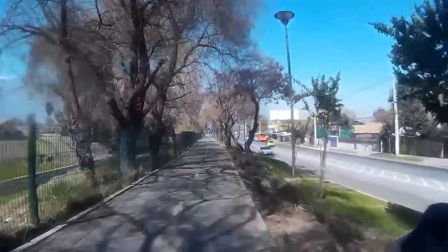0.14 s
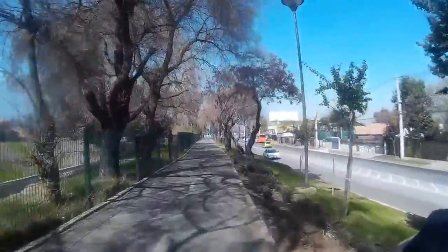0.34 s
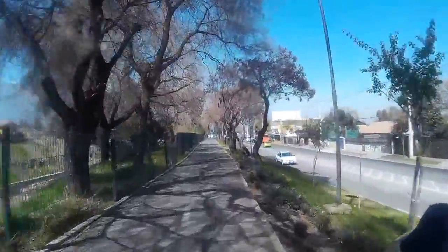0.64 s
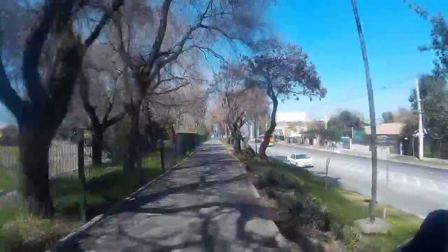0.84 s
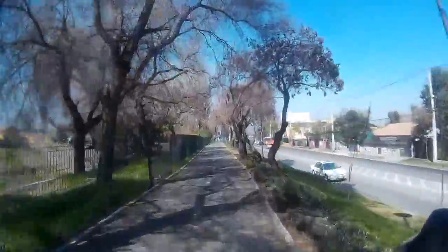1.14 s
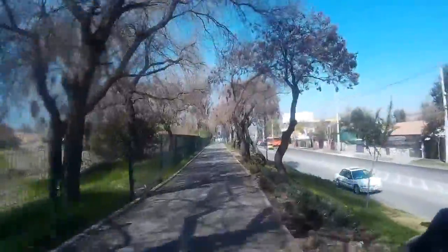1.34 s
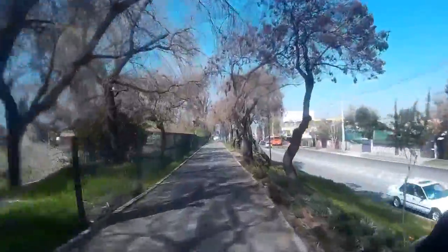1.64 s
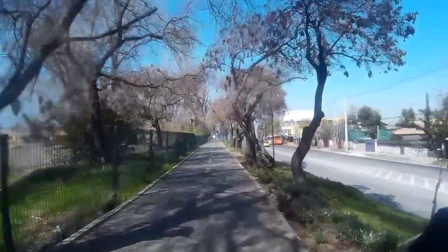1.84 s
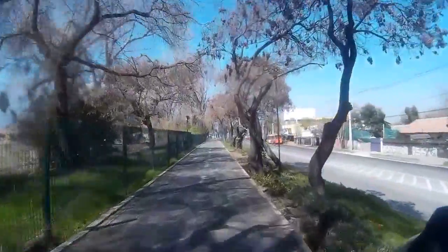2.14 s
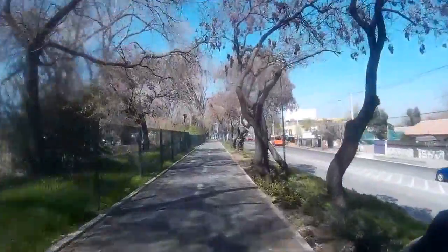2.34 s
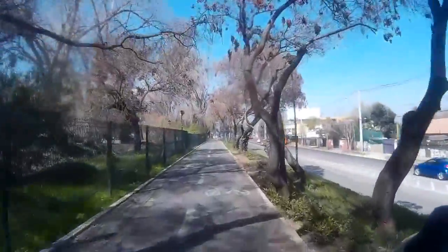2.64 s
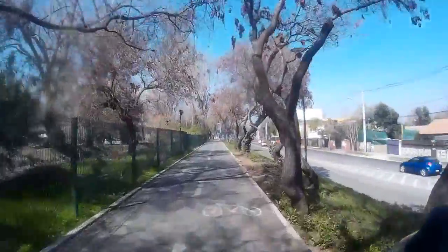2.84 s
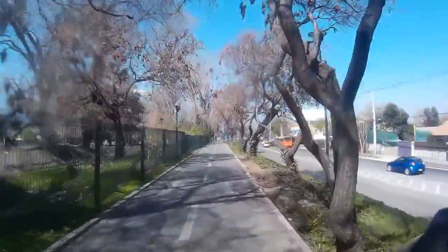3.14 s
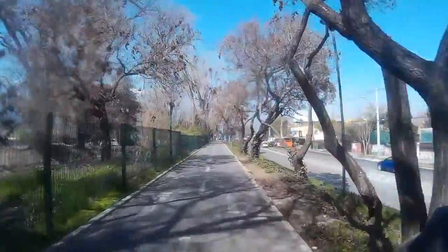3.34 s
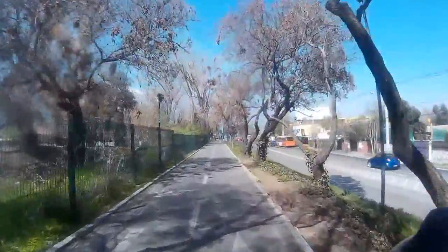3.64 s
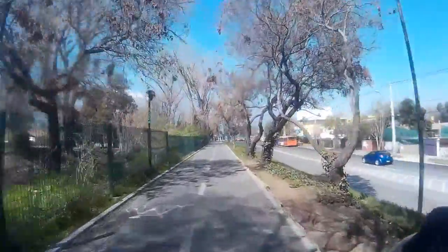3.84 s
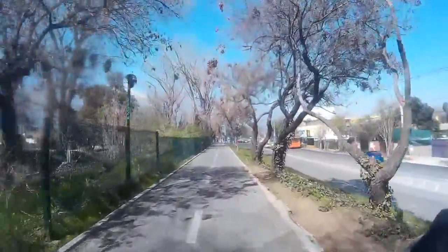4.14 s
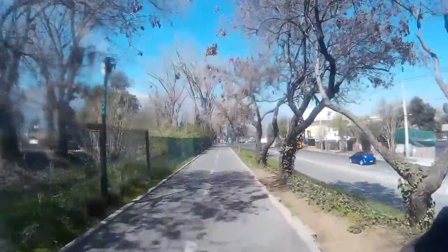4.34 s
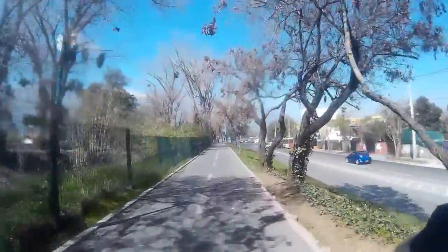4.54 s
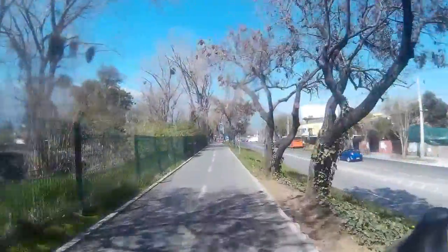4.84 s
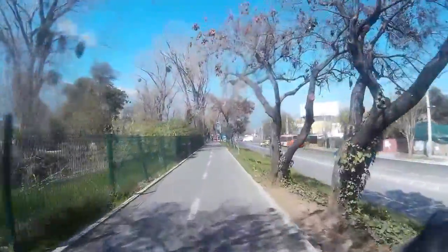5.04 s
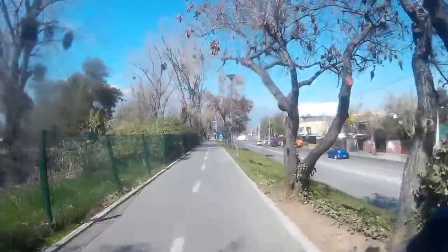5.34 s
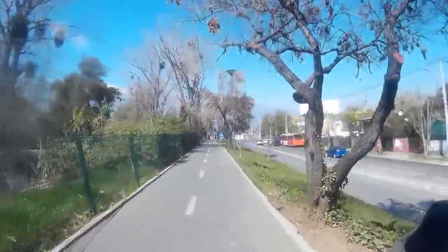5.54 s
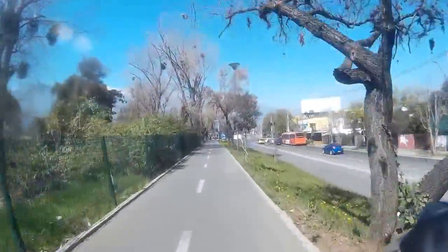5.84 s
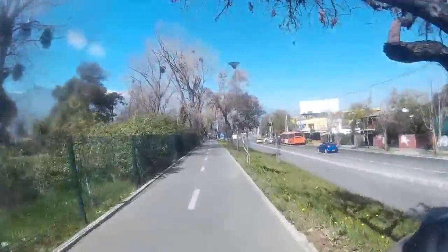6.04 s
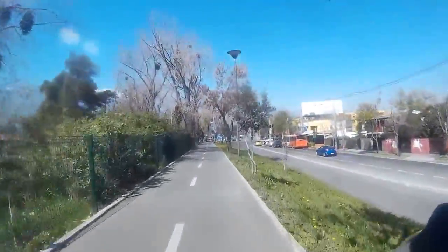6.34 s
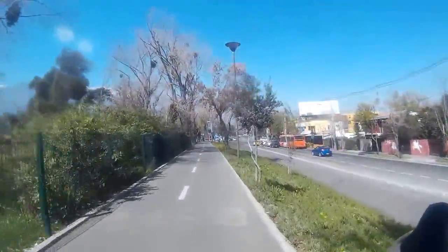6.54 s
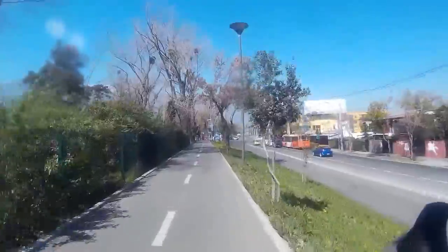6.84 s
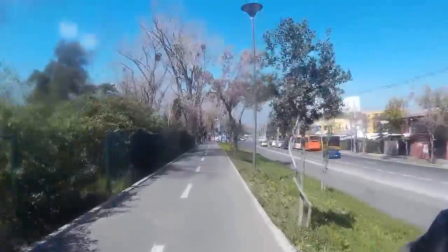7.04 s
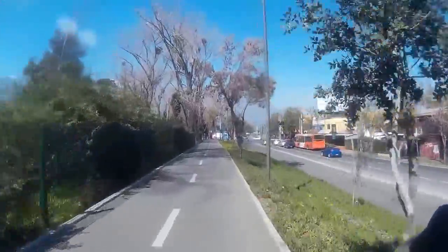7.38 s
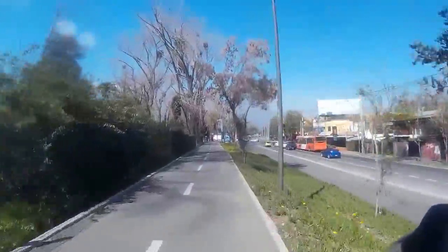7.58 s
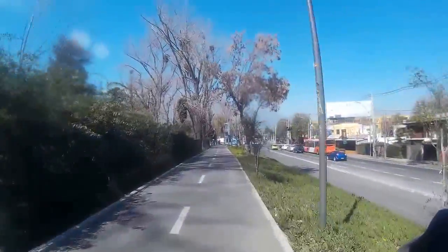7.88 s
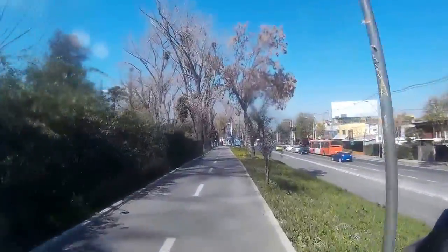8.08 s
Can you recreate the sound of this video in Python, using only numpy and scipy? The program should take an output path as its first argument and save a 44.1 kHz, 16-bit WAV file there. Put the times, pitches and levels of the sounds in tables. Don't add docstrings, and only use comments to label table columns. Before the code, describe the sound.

Continuous boxy rumble of a bike on a paved path, a very low hum surging over bumps, scattered thumps, small ticks and faint hiss.

```python
import sys
import numpy as np
from scipy import signal
from scipy.fft import rfft, irfft, next_fast_len
from scipy.io import wavfile
from scipy.ndimage import uniform_filter1d, map_coordinates

SR = 44100
rng = np.random.default_rng(int(sys.argv[2]) if len(sys.argv) > 2 else 0)


def bounce(signal):
    frames = np.transpose(np.atleast_2d(signal))
    limited = np.clip(frames, -1, 1)
    pcm = np.round(limited * 32767).astype(np.int16)
    wavfile.write(sys.argv[1], SR, pcm)


def level_to_linear(level):
    exponent = np.asarray(level, float) / 20
    return 10 ** exponent


N = 362061

# time in seconds, level in dB.
ROAD = [(0, -36.5), (.5, -37.5), (.6, -36.5), (.68, -40), (.76, -33.5), (1.05, -33), (1.2, -34),
        (1.38, -33), (2, -34), (3.1, -34.5), (3.42, -31), (3.7, -34), (5.1, -36), (5.55, -34), (6.1, -38),
        (6.3, -35), (6.65, -36), (8.21, -35)]
# peak in seconds, level in dB, dying time in seconds.
RIPPLES = [(.12, -47, .06), (.57, -42.5, 0.054), (.74, -44, .05), (1.02, -40, .06), (1.2, -37, .04),
           (1.55, -37, .15), (1.93, -38.5, .04), (2.42, -40, 0.16), (2.93, -37, .05), (3.11, -39, .05),
           (3.42, -30, 0.053), (3.57, -33, .09), (4.02, -40, .1), (4.75, -42, .08), (5.28, -43, .05),
           (5.42, -37, .04), (5.68, -39, .05), (6.03, -37.5, .05), (6.21, -39, 0.046), (6.39, -43, .03),
           (6.53, -38, 0.034), (6.78, -42, 0.16), (7.15, -44, 0.12), (7.7, -41, 0.082), (8.05, -41, 0.043)]
# peak in seconds, level in dB, dying time in seconds.
PATCHES = [(.2, -42, 0.096), (.64, -45, 0.078), (.9, -44.5, 0.14), (1.26, -43, 0.086), (1.53, -43, .07),
           (2.1, -44.5, 0.087), (2.4, -45, 0.24), (3.02, -44.5, 0.064), (3.2, -46.5, 0.11),
           (3.46, -44, 0.13), (3.62, -42.5, 0.13), (4.02, -39.5, 0.075), (4.3, -43, 0.15),
           (5.05, -43.5, 0.027), (5.27, -43.5, 0.15), (5.5, -51, .1), (5.82, -42, 0.092),
           (6.05, -46.5, 0.081), (6.3, -49, 0.12), (6.5, -45, 0.18), (6.75, -44, 0.15), (6.97, -42, .06),
           (7.25, -44.5, 0.16), (7.86, -47, 0.18), (8.05, -50, 0.042)]
# time in seconds, pitch in Hz, level in dB.
SWAY = [(0, 32.5, -34.5), (.55, 31.85, -35), (1.46, 34.62, -30.5), (2.4, 31.9, -32.5), (2.9, 32.8, -36),
        (3.41, 34.92, -40), (3.61, 35, -29), (3.75, 29.8, -34.5), (4.3, 31.7, -43), (4.89, 33.3, -35.5),
        (5.4, 32.3, -36), (5.49, 29.6, -33), (6.1, 33.3, -38), (6.72, 33.2, -28), (7.72, 32.6, -35),
        (7.85, 37.6, -42), (8.21, 36.8, -39)]
# widest swing in seconds, level in dB, dying time in seconds.
JOLTS = [(.16, -36.5, 0.068), (.37, -29, 0.055), (.54, -24, .12), (.72, -29, .04), (.84, -27.5, .1),
         (.99, -24.5, 0.052), (1.14, -24, 0.08), (1.41, -26, 0.041), (1.68, -35.5, .05),
         (2.32, -31.5, 0.031), (2.71, -28, 0.11), (3.28, -31, 0.037), (3.43, -22, .08),
         (3.575, -21.5, .045), (3.82, -20.5, 0.049), (3.99, -32.5, .04), (4.18, -33, 0.025),
         (4.39, -29.5, .05), (4.66, -31.5, 0.033), (5.04, -34.5, .14), (5.33, -30, 0.12), (5.64, -27, 0.23),
         (6.02, -24, 0.054), (6.22, -21.5, 0.073), (6.38, -33, .04), (6.55, -28, 0.12),
         (6.89, -31.5, 0.094), (7.2, -26.5, 0.18), (7.46, -25, 0.053), (7.62, -24, .12)]
# start in seconds, peak level in dB, centre pitch in Hz, length in seconds.
KNOCKS = [(0.247, -48, 1700, .004), (0.450, -52, 1900, .006), (0.574, -27, 600, .005),
          (0.577, -54, 2300, .003), (0.752, -25, 240, .008), (0.907, -33, 600, .004),
          (3.385, -28, 75, .018), (3.435, -26, 92, .015), (3.566, -32, 80, .015), (3.585, -35, 950, .0035),
          (3.926, -35, 630, .005), (4.305, -25, 269, .012), (4.399, -35, 602, .0046),
          (5.418, -44, 1460, .004), (5.563, -23, 262, .009), (5.689, -26, 250, .009),
          (5.903, -42, 1500, .004), (5.905, -36, 1050, .004), (5.909, -31, 556, .0085),
          (6.393, -27, 167, .012), (6.502, -35, 650, .0055), (6.924, -32, 556, .013),
          (7.536, -35, 650, .005), (7.649, -40, 1389, .005), (7.840, -19, 290, .006),
          (7.841, -32, 1430, .004), (7.842, -63, 3480, .005), (7.938, -27, 278, .007),
          (7.968, -38, 1000, .01), (7.969, -52, 1850, .014)]
# time in seconds, upper ring level in dB, lower ring level in dB.
TICKS = [(0.534, -58, -49), (0.5675, -66, -50), (0.5965, -71, -56), (0.7017, -71, -54), (0.808, -73, -58),
         (0.837, -69, -53), (0.874, -77, -54), (0.9066, -72, -54), (1.0016, -71, -54), (1.1406, -57, -48),
         (1.171, -72, -58), (1.2077, -71, -56), (1.3008, -70, -62), (2.8429, -71, -58), (3.4217, -64, -53),
         (3.4531, -70, -54), (3.587, -70, -55), (3.7813, -62, -49), (3.816, -62, -55), (3.846, -60, -49),
         (4.6506, -72, -62), (5.696, -72, -59), (6.2005, -57, -50), (6.2325, -63, -52), (6.9306, -75, -58),
         (7.358, -71, -60), (7.65, -64, -56), (7.676, -63, -48), (7.8431, -64, -60)]

# pitch in Hz, width in Hz, level in dB.
WHEEL_THUD = [(63.3, 22, -2), (94, 40, -1.5)]
FORK = [(157, 52.5, -3), (181.4, 18.7, 0.5), (226.9, 46, -1.5), (255, 52, -0.5), (289, 42, -3.5),
        (325.6, 30.6, -10.5)]
TUBES = [(382.8, 75.5, 2), (464, 54, -10.5), (536.7, 59, 2), (580, 42, 1), (627.8, 64, 1.5), (725, 59, -6),
         (820, 84, -3.5), (881.6, 114, -3.5), (999, 61, -13.5)]
HOUSING = [(1070, 120, -27.5), (1169, 41, -6.5), (1235.2, 85, 2), (1293, 64, -2.5)]
SHELL = [(1449, 105, 2.5), (1596, 170, -6), (1800, 370, -13), (2010, 440, -14), (2275, 720, -25),
         (2830, 2100, -31.5), (3745, 1600, -34.5)]
LOOSE_HIGH = [(3780, 250, 4), (4270, 250, -6), (3400, 300, -6), (2800, 500, -12), (5500, 900, -17)]
LOOSE_LOW = [(1900, 200, 7), (1670, 180, 7), (2280, 350, -7)]

# frequency in Hz, level per Hz in dB.
HISS = [(2650, -6.5), (4500, -3), (6210, -3), (6720, -3), (14800, -3), (15200, -5), (15900, -9)]

JOLT_RISE_S, RIPPLE_RISE_S, PATCH_RISE_S = 0.039, 0.055, 0.061


def unit(x):
    return x / np.sqrt(np.mean(x ** 2) + 1e-20)


def curves(rows):
    s, *columns = np.transpose(rows)
    return [np.interp(np.arange(N) / SR, s, column) for column in columns]


def wobble(rate):
    knots = rng.standard_normal(int(N * rate / SR) + 4)
    return map_coordinates(knots, [np.arange(N) * rate / SR])


def swells(rows, rise_s):
    t = np.arange(0, N / SR, .002)
    s, db, dying_s = np.transpose(rows)[:, :, None]
    width_s = np.where(t < s, rise_s, dying_s)
    swell = level_to_linear(db) * np.exp(-((t - s) / width_s) ** 2)
    total = np.sqrt(np.sum(swell ** 2, axis=0))
    return np.interp(np.arange(N) / SR, t, total)


def response(modes, size=8192):
    hz = np.fft.rfftfreq(size, 1 / SR)
    power = sum(level_to_linear(2 * db) / (1 + (2 * (hz - centre) / width) ** 2) ** 2 for centre, width, db in modes)
    cepstrum = irfft(.5 * np.log(power + 1e-14), size)
    cepstrum[1:size // 2] *= 2
    cepstrum[size // 2 + 1:] = 0
    ring = irfft(np.exp(rfft(cepstrum)), size)[:size // 2]
    return ring / np.linalg.norm(ring)


def rings(drive, modes):
    return signal.fftconvolve(drive, response(modes))[:len(drive)]


def grit(rate, lumpy_db):
    return unit(rng.standard_normal(N) * level_to_linear(lumpy_db * wobble(rate)))


def tyres(swing):
    shared = level_to_linear(0.68 * wobble(18))
    road_db, = curves(ROAD)
    rougher_db = road_db - road_db.mean()
    thuds = swells(RIPPLES, RIPPLE_RISE_S)
    singing = swells(PATCHES, PATCH_RISE_S)
    # resonances, level in dB, growth with roughness, drift in dB, stones a second,
    # lumpiness in dB, extra gain.
    parts = [(WHEEL_THUD, -47, .4, 1.5, 12, .5, thuds),
             (FORK, -34.5, .9, .6, 25, .8, 0),
             (TUBES, -42.5, .4, .6, 70, 1.4, 0),
             (HOUSING, -48, .1, .6, 40, .7, singing)]
    frame = np.zeros(N)
    for modes, db, grows, drift_db, rate, lumpy_db, extra in parts:
        gain = np.hypot(level_to_linear(db + grows * rougher_db + drift_db * wobble(7)), extra)
        frame += gain * unit(rings(shared * grit(rate, lumpy_db), modes))
    upswing = np.clip(uniform_filter1d(np.gradient(swing), size=150), 0, None)
    chafe = 1 + 0.037 * unit(upswing) ** 2
    shell = unit(rings(chafe * shared * grit(35, lumpy_db=0.77), SHELL))
    return frame + level_to_linear(-60.5) * shell


def sway():
    pitch_hz, rest_db = curves(SWAY)
    cycles = np.cumsum(pitch_hz + 1.64 * wobble(5.6)) / SR
    touch = np.array([round(s * SR) for s, high_db, low_db in TICKS if high_db > -70.5])
    slip = np.unwrap((cycles[touch] - .15) % 1, period=1)
    cycles = cycles - uniform_filter1d(np.interp(np.arange(N), touch, slip), size=1500)
    swing = np.sqrt(2) * np.sin(2 * np.pi * cycles)
    swing += level_to_linear(-28.5) * np.sin(4 * np.pi * cycles + 0.77)
    road_push = rng.standard_normal(N)
    shudder = level_to_linear(-7.5) * unit(rings(road_push, [(26.7, 6.8, 8), (38.28, 6.6, 3.0), (47.4, 7.7, -2.5)]))
    gain = np.hypot(level_to_linear(rest_db + 2.8 * wobble(14)), swells(JOLTS, JOLT_RISE_S))
    return gain * level_to_linear(-.8) * (swing + shudder)


def knocks():
    out, t = np.zeros(N + SR), np.arange(SR // 8) / SR
    for s, db, hz, length_s in KNOCKS:
        fade = (1 - np.exp(-(t * hz) ** 2)) * np.exp(-t / length_s)
        chance = rng.standard_normal(len(t))
        rough = unit(rings(chance, [(hz, 0.28 * hz, 0)])[::-1])
        blow = np.sin(2 * np.pi * hz * t) + 0.3 * rough
        out[round(s * SR):][:len(t)] += level_to_linear(db) * fade / fade.max() * blow
    return out[:N]


def ticks():
    out, t = np.zeros(N + SR), np.arange(SR // 40) / SR
    lead = SR // 200
    scrape = np.exp(-np.abs(t - lead / SR) / .0025)
    for s, high_db, low_db in TICKS:
        for modes, db, scrape_gain in ((LOOSE_HIGH, high_db, .07), (LOOSE_LOW, low_db, .18)):
            tap = scrape_gain * scrape * rng.standard_normal(len(t))
            tap[lead] += 1
            ring = rings(tap, modes)
            out[round(s * SR) - lead:][:len(t)] += level_to_linear(db + 4) * ring / np.abs(ring).max()
    return out[:N]


def hiss():
    size = next_fast_len(N)
    hz, db = np.transpose(HISS)
    colour = level_to_linear(np.interp(np.log(np.fft.rfftfreq(size, 1 / SR) + 1), np.log(hz), db))
    noise = irfft(rfft(rng.standard_normal(size)) * colour, size)[:N]
    return level_to_linear(-74 + .3 * wobble(3.2)) * unit(noise)


def scene():
    opening = 1 - np.exp(-np.arange(N) / SR / .001)
    swing = sway()
    ride = tyres(swing) + swing + knocks() + ticks()
    return (opening * ride + hiss())[None]


def top_cut(x):
    return signal.sosfilt(signal.butter(12, 16040, fs=SR, output="sos"), x)


def record(dry):
    return top_cut(dry)


dry = scene()
out = record(dry)
bounce(out)
```